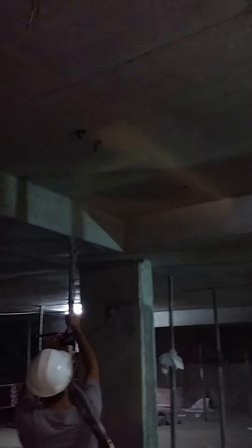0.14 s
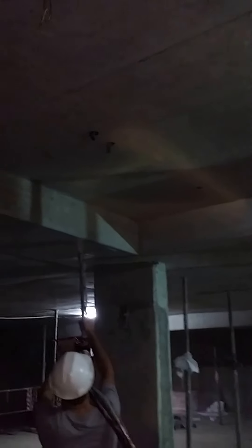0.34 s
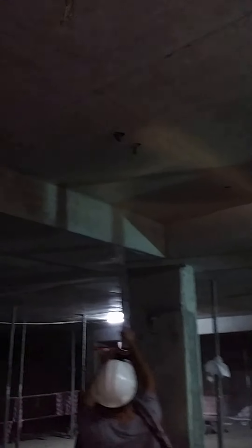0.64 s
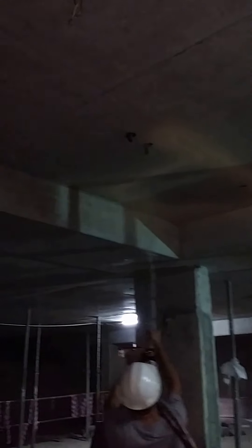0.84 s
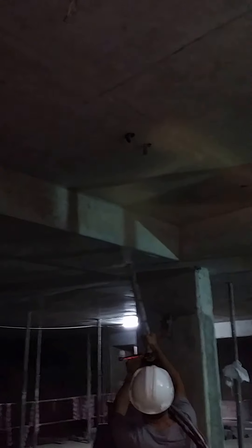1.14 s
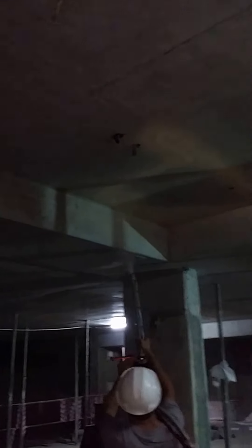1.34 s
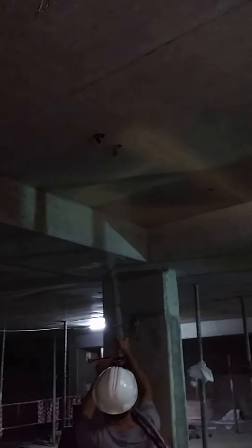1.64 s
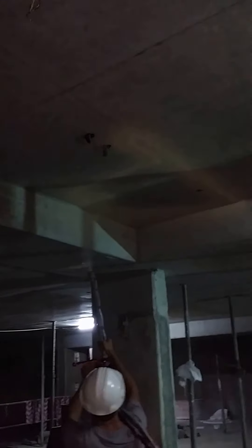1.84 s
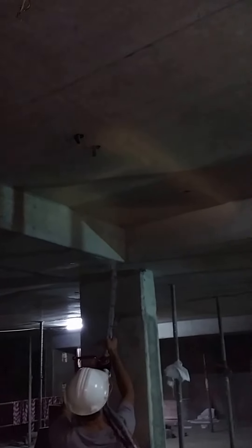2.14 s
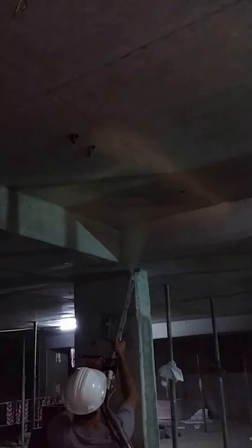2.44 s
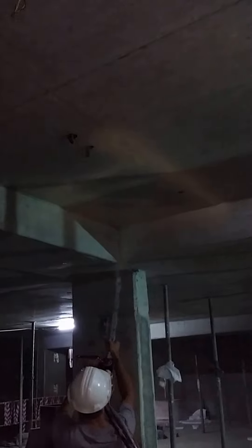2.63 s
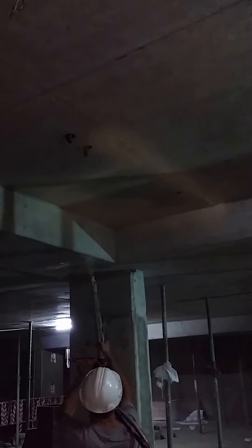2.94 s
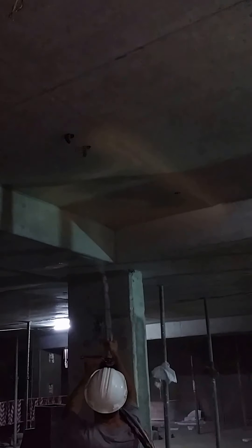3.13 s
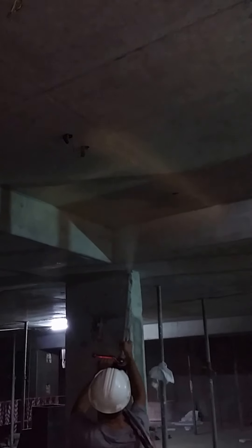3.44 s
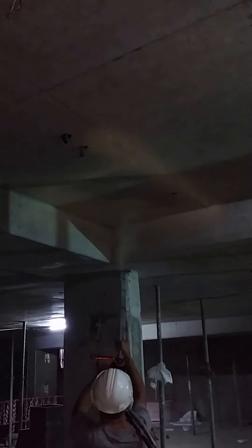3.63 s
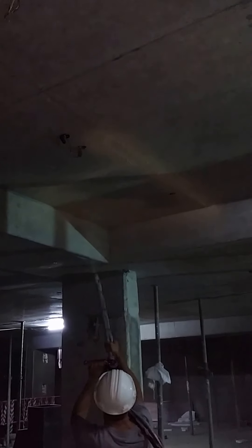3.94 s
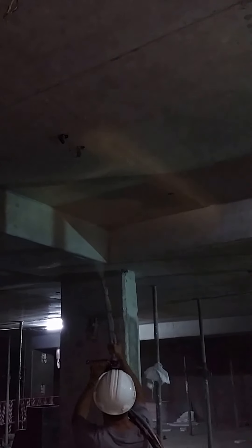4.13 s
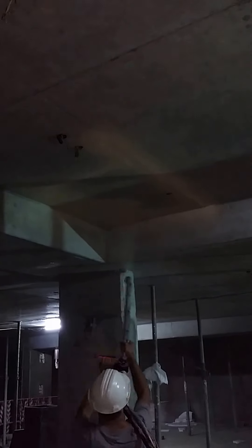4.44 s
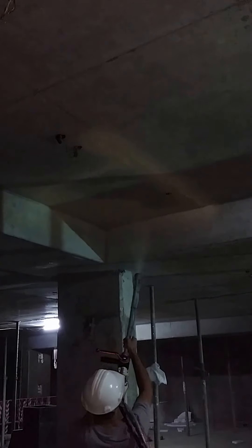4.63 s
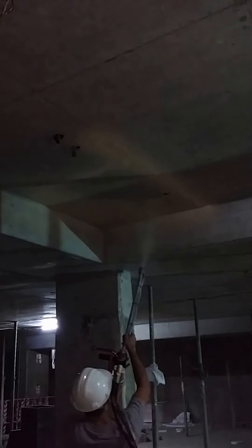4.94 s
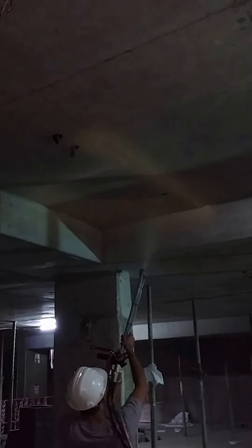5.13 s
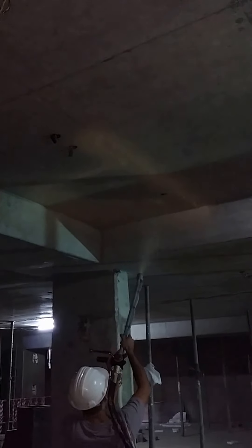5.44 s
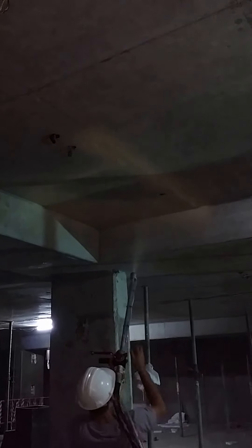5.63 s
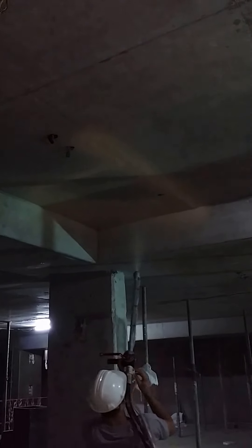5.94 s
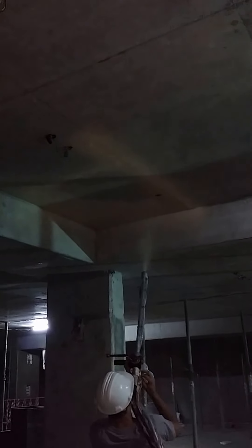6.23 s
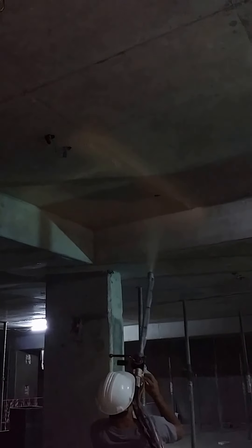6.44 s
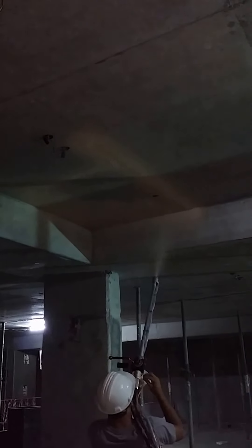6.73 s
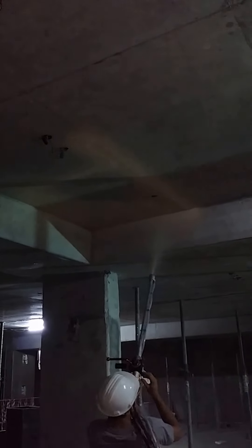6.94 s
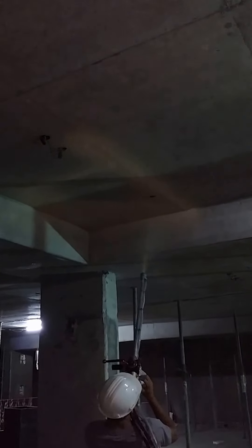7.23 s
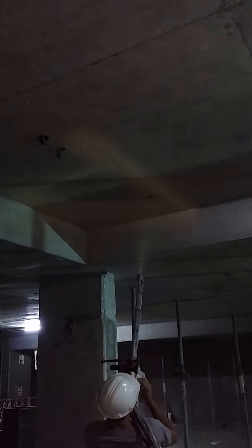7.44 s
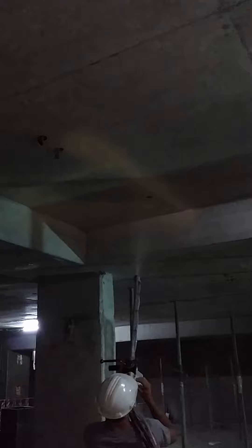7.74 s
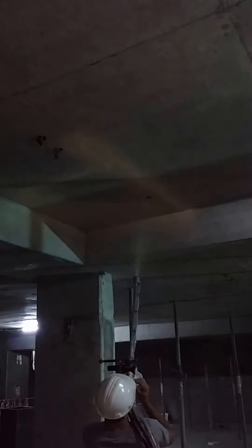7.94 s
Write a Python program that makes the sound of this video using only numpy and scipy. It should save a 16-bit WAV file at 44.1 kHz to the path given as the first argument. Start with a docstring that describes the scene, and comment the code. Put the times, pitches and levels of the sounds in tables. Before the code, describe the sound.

A spray gun blows plaster at a concrete ceiling with a bright, continuous hiss of air. Further off a pump rumbles, with a few soft low thumps. Twice the pump takes a slow stroke, and its rumble swells with a brief hum. Near the end the nozzle gives short, high whistles. The place is a bare, echoing hall, and the bass sounds slightly watery.

```python
"""A spray gun blows plaster at a concrete ceiling in a bare, echoing hall. From the start a
bright air jet hisses and a pump further off rumbles, with soft low thumps here and there;
the bass has a watery, compression-like flicker. At 3 s and again at 6.3 s the pump takes a
slow stroke: the rumble swells and a hum joins it. From 6.4 s the nozzle whistles in bursts."""
import sys
import numpy as np
from scipy import signal
from scipy.fft import rfft, irfft, next_fast_len
from scipy.io import wavfile
from scipy.ndimage import uniform_filter1d

SR = 44100
rng = np.random.default_rng(int(sys.argv[2]) if len(sys.argv) > 2 else 0)


def generate_wav(signal):
    """Clip the signal to [-1, 1] and save it as 16-bit WAV at the path in sys.argv[1]."""
    frames = np.transpose(np.atleast_2d(signal))
    scaled = np.clip(frames, -1, 1) * 32767
    pcm = np.round(scaled).astype(np.int16)
    wavfile.write(sys.argv[1], SR, pcm)


N = 356769


def gain_of(db):
    return 10 ** (np.asarray(db) / 20)


def unit_rms(x):
    return x / np.sqrt(np.mean(x ** 2) + 1e-20)


def at_hz(points, hz):
    """Curve value at hz, interpolated in log frequency."""
    freq_hz, value = np.transpose(points)
    return np.interp(np.log(hz + 1), np.log(freq_hz + 1), value)


def at_time(rows, t):
    """Each value column, interpolated at times t."""
    time_s, *values = np.transpose(rows)
    return [np.interp(t, time_s, column) for column in values]


def patches(shape, frames, bins=1):
    """Smooth random field over frequency and time, rms 1."""
    field = uniform_filter1d(rng.standard_normal(shape), bins, axis=-2)
    return unit_rms(uniform_filter1d(field, frames, axis=-1))


def stft_grid(size):
    """Bin frequencies and frame times."""
    hop = size // 4
    return np.fft.rfftfreq(size, 1 / SR), np.arange(N // hop + 5) * hop / SR


def burst(t, start_s, length_s, rise_s, fade_db_per_s):
    """Gain: linear rise, hold until start_s + length_s, exponential fade."""
    fade_db = -fade_db_per_s * np.maximum(t - start_s - length_s, 0)
    return np.clip((t - start_s) / rise_s, 0, 1) * gain_of(fade_db)


def noise_pair(field_db, hz):
    """Partly coherent stereo noise, shaped over frequency and time."""
    # left-right likeness: freq_hz, correlation
    coherence = [(60, 0.96), (180, 0.75), (550, 0.11), (1650, 0.074), (4970, 0.0038), (15000, -0.1)]
    same = at_hz(coherence, hz)[:, None]
    a, b, c, d = rng.standard_normal((4,) + field_db.shape[-2:])
    left = a + 1j * b
    right = same * left + np.sqrt(1 - same ** 2) * (c + 1j * d)
    spectra = np.array([left, right]) * gain_of(field_db)
    size = 2 * len(hz) - 2
    return signal.istft(spectra, nperseg=size, noverlap=size * 3 // 4)[1][:, :N]


def fuzzy_tone(hz, width_hz, coherence, steady):
    """Stereo carrier times slow complex noise, rms 1; steady (0-1) flattens its swings."""
    step = 16
    count = N // step + 1
    pole = np.exp(-np.pi * width_hz * step / SR)
    white = rng.standard_normal((3, count)) + 1j * rng.standard_normal((3, count))
    slow = signal.lfilter([1], [1, -2 * pole, pole * pole], white)
    slow = np.sqrt(coherence) * slow[0] + np.sqrt(1 - coherence) * slow[1:]
    slow /= abs(slow) ** steady
    envelope = np.array([np.interp(np.arange(N) / step, np.arange(count), side) for side in slow])
    carrier = np.exp(2j * np.pi * hz * np.arange(N) / SR)
    return unit_rms((envelope * carrier).real)


def jet():
    """Turbulent air and plaster: hiss whose nozzle band and treble vary separately."""
    # jet over time: time_s, flow_db, nozzle_db, treble_db
    flow = [(0.0, -26, 7, 2), (0.02, -26.5, 8, 3.5), (1.04, -25, 4, 1.5), (1.42, -29, 11, 4.5),
            (1.73, -25.5, 3.5, 2), (1.8, -29, 13.5, 6), (2.03, -27, 5.5, 2.5), (3.38, -26, 4.5, 1.5),
            (3.56, -23.5, -0.5, 1), (3.6, -24.5, 3, 2), (4.12, -26.5, 7.5, 4.5), (4.15, -24, 0.5, -1),
            (4.24, -27, 6, 2.5), (4.44, -23, -0.5, -0.5), (4.98, -26, 9, 1.5), (5.11, -24.5, 5, 0.5),
            (6.26, -27, 7.5, 1.5), (6.47, -22.5, 1, -1.5), (6.65, -24, 3, -1), (7.12, -24.5, 5.5, 0),
            (7.44, -25.5, 5.5, 1.5), (7.5, -22, -2, -1.5), (8.09, -24, 2, 0)]
    # hiss spectrum: freq_hz, density_db
    colour = [(500, -73), (850, -61), (1350, -14), (1830, -14), (2040, -9.5), (2240, -10), (2810, -6.5),
              (3250, -5), (3620, -5), (3910, -4.5), (4400, -2.5), (5310, -3.5), (6000, -2), (6650, 0.5),
              (7050, 0.5), (7500, -0.5), (8300, -2.5), (9500, -5), (13800, -8), (14400, -8.5)]
    # weight of nozzle_db: freq_hz, share
    nozzle_share = [(4500, 0.22), (6500, 0.48), (8500, 0.53), (10000, 0.058)]
    # weight of treble_db: freq_hz, share
    treble_share = [(8000, 0.084), (10500, 0.89)]
    # echo ridges: freq_hz, depth_rms_db
    ridges = [(1000, 5.5), (3000, 3), (6000, 3), (12000, 2)]
    hz, t = stft_grid(1024)
    _, nozzle_db, treble_db = at_time(flow, t)
    field_db = at_hz(colour, hz)[:, None] + np.zeros((2, 1, len(t)))
    field_db += at_hz(nozzle_share, hz)[:, None] * (nozzle_db - nozzle_db.mean())
    field_db += at_hz(treble_share, hz)[:, None] * (treble_db - treble_db.mean())
    # random ridges stand for ceiling and beam echoes, drifting as the gun moves
    field_db += at_hz(ridges, hz)[:, None] * patches(field_db.shape, frames=20)
    field_db += .5 * patches(field_db.shape, frames=16, bins=12)
    field_db += .36 * patches((1, len(t)), frames=7)  # flutter from plaster lumps
    level_db = 10.5 + at_time(flow, np.arange(N) / SR)[0]
    return gain_of(level_db) * unit_rms(noise_pair(field_db, hz))


def pump_load_db(t):
    """Drive over idle: idling and strokes summed in power."""
    # pump strokes: start_s, length_s, drive_db
    strokes = [(-.5, 0.48, -41.5), (3.0, 2.14, -36), (6.299, 1.6, -35)]
    idle_db = -40.5
    power = sum((gain_of(db - idle_db) * burst(t, start_s, length_s, rise_s=.16, fade_db_per_s=8.5)) ** 2
                for start_s, length_s, db in strokes)
    return 10 * np.log10(1 + power)


def spectral_holes_db(hz, t):
    """Brief watery holes in the low sound, as from audio compression."""
    # holes: centre_s, length_s, centre_hz, width_oct
    holes = [(.76, .07, 90, 1.4), (.8, .05, 400, .6), (.94, .1, 700, .5), (1.11, .09, 90, 1.4),
             (1.14, .07, 720, .5), (1.3, .07, 440, .4), (1.66, .07, 560, 1.1), (1.82, .12, 85, 1.3),
             (1.84, .12, 780, .25), (1.91, .06, 430, .7), (2.39, .04, 320, .9), (4.03, .08, 95, 1.3),
             (5.56, .06, 100, 1.5)]
    depth_db, total_db = -28, 0
    for centre_s, length_s, centre_hz, width_oct in holes:
        off_time = 2 * (t - centre_s) / length_s
        off_pitch = 2 * np.log2((hz + 1) / centre_hz) / width_oct
        total_db += depth_db * np.exp(-off_time ** 4 - off_pitch ** 4)
    return total_db


def pump():
    """Low drones and a rumble that swells under load, with compression-like flicker in the bass."""
    # rumble spectrum: freq_hz, density_db
    colour = [(25, -53), (60, -38), (100, -12.5), (140, 11.5), (185, -0.5), (260, 6.5), (300, -2.5),
              (345, 0.5), (430, -4.5), (500, -4.5), (620, -2), (800, -1.5), (1200, 2.5), (1900, -16.5)]
    # warble within bands: freq_hz, scale_db
    warble_scale = [(40, 10), (90, 7), (200, 8), (400, 13), (800, 13), (1500, 10)]
    # flicker of the whole bass: freq_hz, scale_db
    flicker_scale = [(40, 11), (100, 9), (160, 4), (250, 2), (600, 1)]
    # rise with load: freq_hz, db_per_load_db
    load_slope = [(100, 1.15), (200, 1.4), (300, 1.8), (500, 2.64), (700, 2.11), (1200, 1.58)]
    # drones at hall resonances: pitch_hz, width_hz, level_db
    hall_modes = [(141.1, 10, -54), (204.7, 20, -51.5), (276.5, 19, -68)]
    idle_rms_db = -40.5
    hz, frame_s = stft_grid(2048)
    load_db = pump_load_db(frame_s)
    # watery, compression-like warble in the low noise, deeper when it is quiet
    warble_depth = np.clip(1.5 - .14 * load_db, .45, 1.5)
    grain = patches((len(hz), len(frame_s)), frames=4, bins=4)
    warble = warble_depth * np.tanh(2 * (grain + 1.2 - .75 * warble_depth))
    flicker = np.sqrt(warble_depth) * np.minimum(patches((1, len(frame_s)), frames=4), .6)
    idle_db = at_hz(colour, hz)[:, None] + at_hz(warble_scale, hz)[:, None] * warble
    idle_db += at_hz(flicker_scale, hz)[:, None] * flicker + spectral_holes_db(hz[:, None], frame_s)
    loaded_db = idle_db + at_hz(load_slope, hz)[:, None] * load_db
    load_gain = np.sqrt(np.mean(gain_of(loaded_db) ** 2) / np.mean(gain_of(idle_db) ** 2))
    rumble = gain_of(idle_rms_db) * load_gain * unit_rms(noise_pair(loaded_db, hz))

    t, drones = np.arange(N) / SR, 0
    wavers = gain_of(4.5 * patches((len(hall_modes), 1, N), frames=3500))
    for waver, (pitch_hz, width_hz, level_db) in zip(wavers, hall_modes):
        flicker_db = at_hz(flicker_scale, pitch_hz) * flicker[0] + spectral_holes_db(pitch_hz, frame_s)
        gain = waver * gain_of(level_db + np.interp(t, frame_s, flicker_db))
        drones += gain * fuzzy_tone(pitch_hz, width_hz, coherence=.68, steady=.2)
    return rumble + drones


def thumps():
    """Soft low pushes, centred: a few clear ones among faint random ones."""
    # clear thumps: time_s, envelope_peak_db, pitch_hz
    clear_thumps = [(0.983, -46, 87), (1.88, -51, 83.4), (2.029, -43, 70.0), (2.578, -46, 86.1),
                    (2.881, -41, 78.1), (5.592, -44, 107), (5.784, -44, 108), (7.022, -35, 95)]
    width_s = .0141
    faint_per_s, faint_db, faint_hz = 2.4, -66, 85
    t = np.arange(6 * width_s * SR) / SR
    swell = np.exp(-(t / width_s - 3) ** 2)
    faint = (rng.random(N) < faint_per_s / SR) * gain_of(faint_db + 7.9 * rng.standard_normal(N))
    out = signal.oaconvolve(faint, swell * np.sin(2 * np.pi * faint_hz * t))[:N]
    for time_s, peak_db, pitch_hz in clear_thumps:
        at = round((time_s - 2 * width_s) * SR)
        out[at:at + len(t)] += gain_of(peak_db) * swell * np.sin(2 * np.pi * pitch_hz * t)
    return out


def hum():
    """The pump takes load and spins up to pitch; overtones crest before the fundamental."""
    # hums: start_s, length_s, first_hz, last_hz, partial1_db, partial2_db, partial3_db
    hums = [(3.25, 0.75, 208, 209, -46, -43, -50), (6.6, .62, 196, 213, -35.5, -46, -44)]
    # crest time of partials 1-3: share_of_length
    crests = [.55, .42, .33]
    # phase drift of partials 1-3: scale_rad
    blur_rad = [.5, 1.3, 1.8]
    spin_up_s, taper_db = .17, -16
    t, out = np.arange(N) / SR, np.zeros((2, N))
    wander = .015 * uniform_filter1d(patches((1, N), frames=900)[0], 300)
    wobble = 1 + .28 * uniform_filter1d(patches((3, 2, 1, N), frames=1100)[:, :, 0], 300)
    drift = uniform_filter1d(patches((3, 1, N), frames=1300)[:, 0], 400)
    for start_s, length_s, first_hz, last_hz, *partials_db in hums:
        on = (t > start_s - length_s / 2) & (t < start_s + 1.5 * length_s)
        age_s = t[on] - start_s
        pitch_hz = last_hz + (first_hz - last_hz) * np.exp(-(np.maximum(age_s, 0) / spin_up_s) ** 2)
        phase = 2 * np.pi * np.cumsum(pitch_hz * (1 + wander[on])) / SR
        for k, crest_db in enumerate(partials_db):
            level_db = crest_db + taper_db * (2 * (age_s / length_s - crests[k])) ** 2
            amplitude = np.sqrt(2) * gain_of(level_db) * wobble[k][:, on] ** (k + 1)
            out[:, on] += amplitude * np.sin((k + 1) * phase + blur_rad[k] * drift[k][on])
    return out


def whistle():
    """Nozzle edge tones that rise, flutter and fade together."""
    # whistle bursts: start_s, length_s, gain_db
    bursts = [(6.4, .12, -39), (7.02, .18, -36), (7.23, .19, -38), (7.43, .12, -34.5), (7.57, .16, -34.5),
              (7.77, .15, -36), (7.94, .2, -36)]
    # edge tones: pitch_hz, width_hz, relative_db, left_over_right_db
    edge_tones = [(5420, 200, 3.5, 1), (5955, 85, 8.5, -1), (7030, 220, 7.5, -2), (11550, 120, -5, 0)]
    t, tones = np.arange(N) / SR, 0
    envelope = sum(gain_of(db) * burst(t, start_s, length_s, rise_s=.04, fade_db_per_s=152)
                   for start_s, length_s, db in bursts)
    flutter = gain_of(patches((1, N), frames=1700)[0])  # 1 dB rms
    for pitch_hz, width_hz, db, balance_db in edge_tones:
        gains = gain_of([[db + balance_db / 2], [db - balance_db / 2]])
        tones += gains * fuzzy_tone(pitch_hz, width_hz, coherence=.06, steady=.45)
    return envelope * flutter * tones


def scene():
    """Spray gun and pump, summed in stereo."""
    return jet() + whistle() + pump() + hum() + thumps()


def record(dry):
    """Two microphone ports of unequal colour, peak clipping, then a low-pass."""
    # port balance: freq_hz, left_over_right_db
    balance = [(130, 2), (270, 3), (500, 0), (1000, 6.5), (2000, 1.5), (3300, 3), (4600, 1.5), (5800, 2),
               (6700, -0.5), (7300, 3), (7900, 7.5), (9000, 7), (11000, 5.5), (14000, 4.5)]
    clip_level, cutoff_hz = .93, 14520
    size = next_fast_len(N)
    left_db = at_hz(balance, np.fft.rfftfreq(size, 1 / SR)) / 2
    ports = irfft(rfft(dry, size) * gain_of([left_db, -left_db]), size)[:, :N]
    lowpass = signal.firwin(1537, cutoff_hz, window=("kaiser", 8), fs=SR)
    return signal.oaconvolve(np.clip(ports, -clip_level, clip_level), lowpass[None], "same")


dry = scene()
out = record(dry)
generate_wav(out)
```